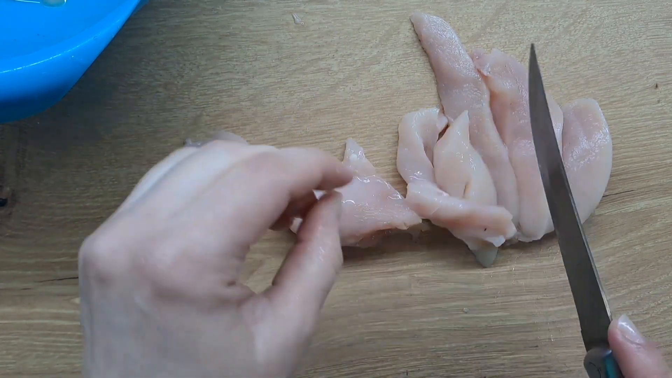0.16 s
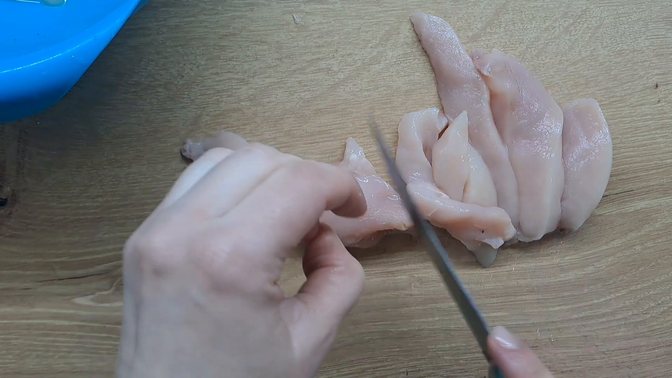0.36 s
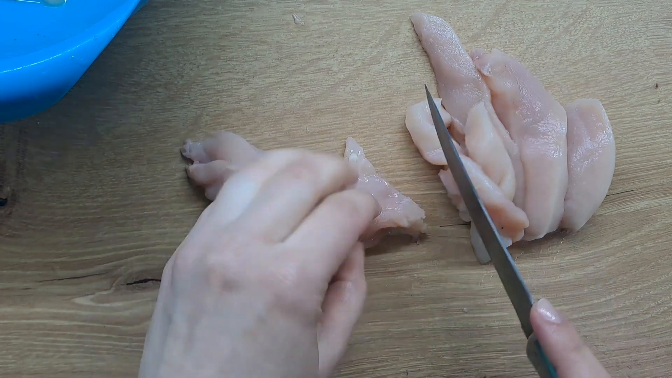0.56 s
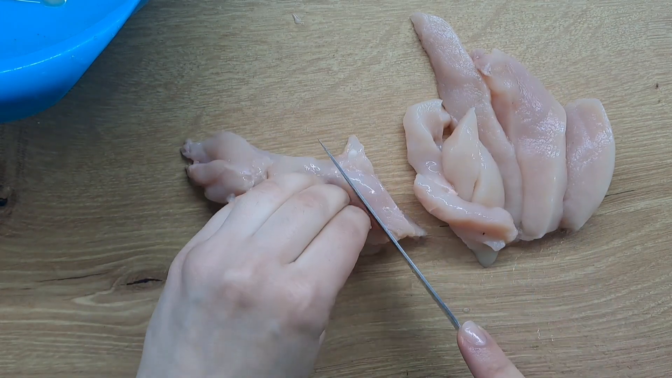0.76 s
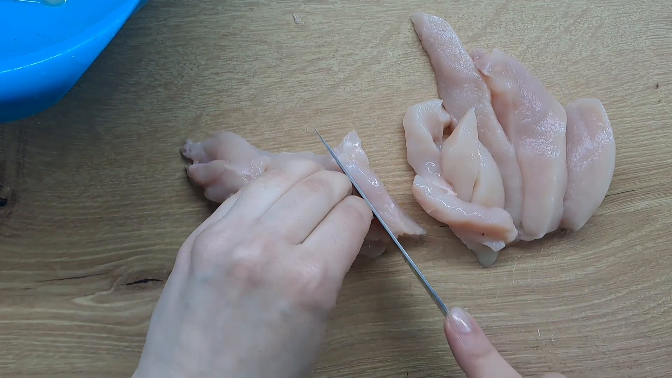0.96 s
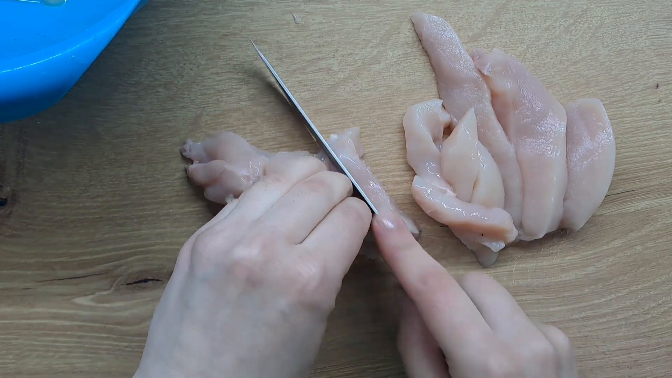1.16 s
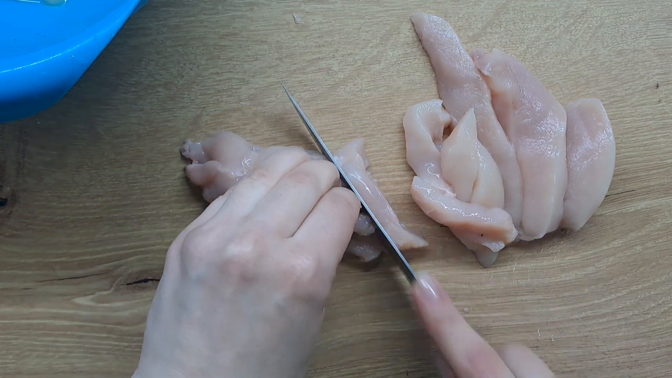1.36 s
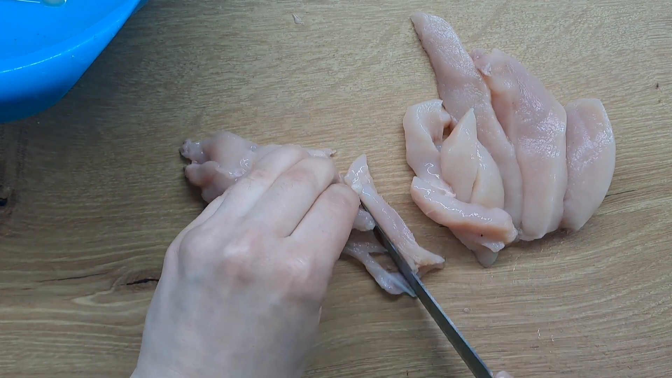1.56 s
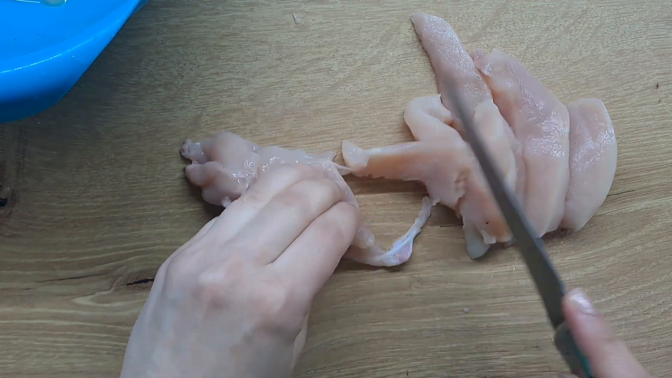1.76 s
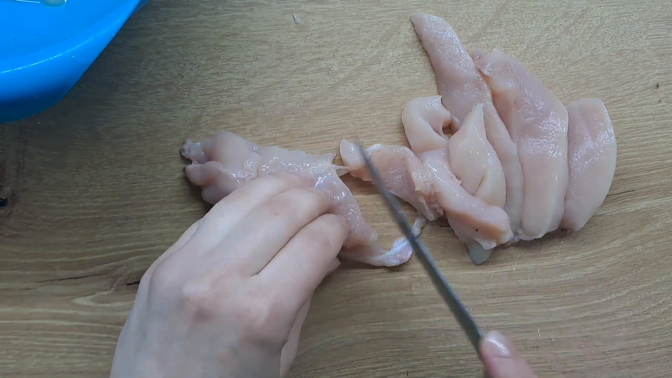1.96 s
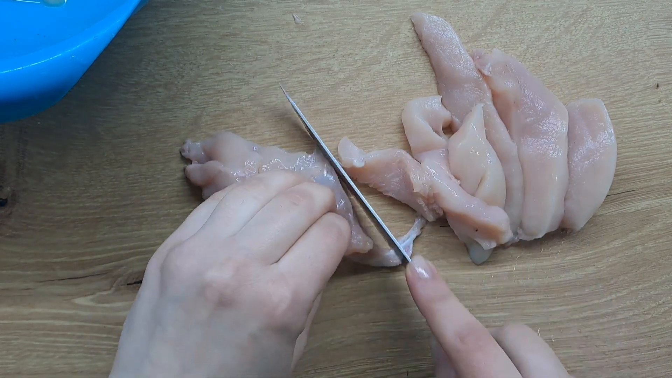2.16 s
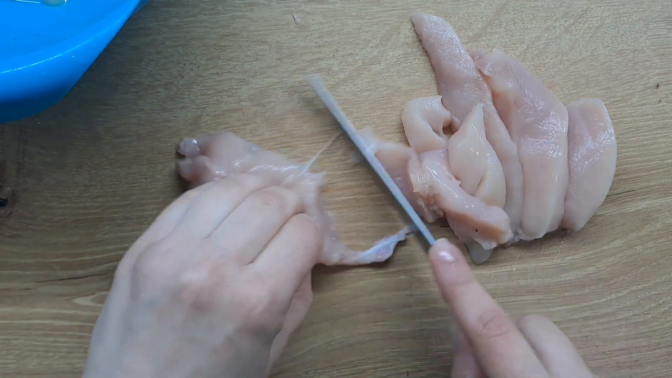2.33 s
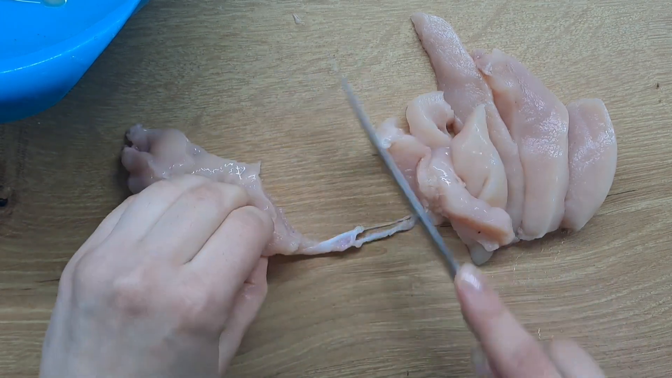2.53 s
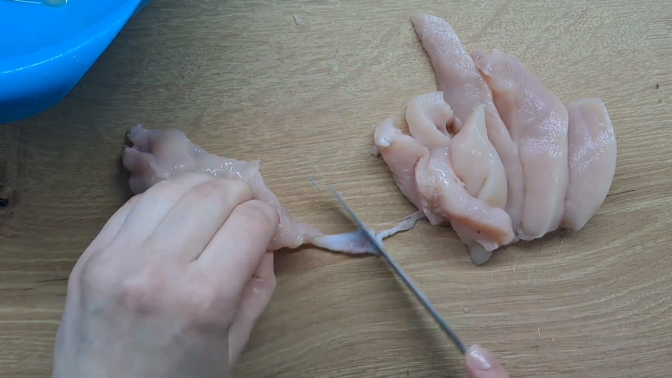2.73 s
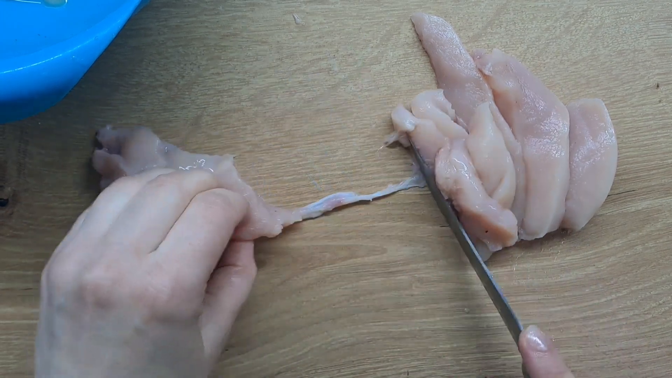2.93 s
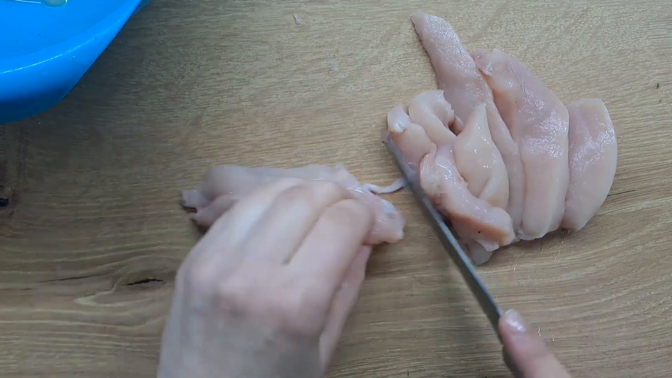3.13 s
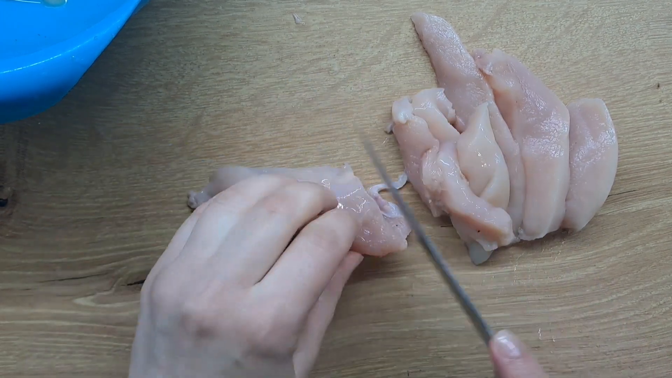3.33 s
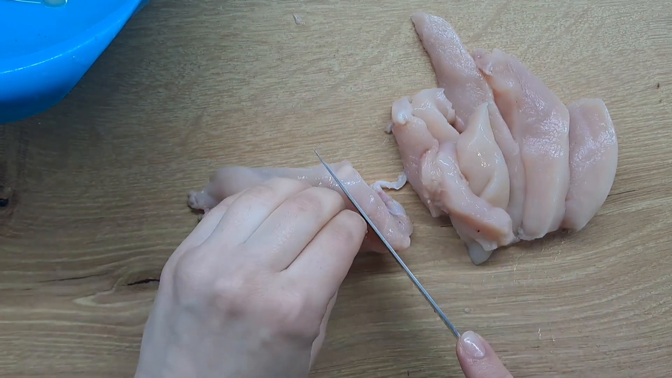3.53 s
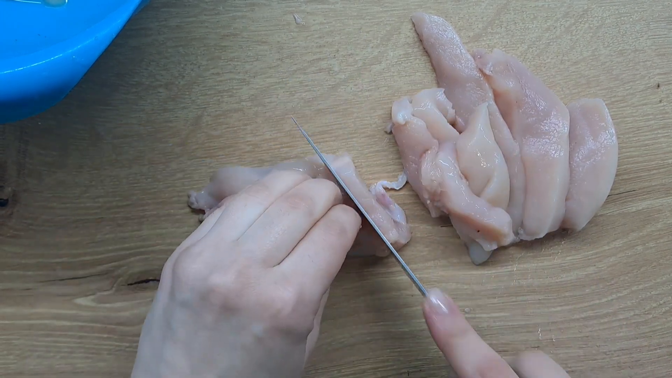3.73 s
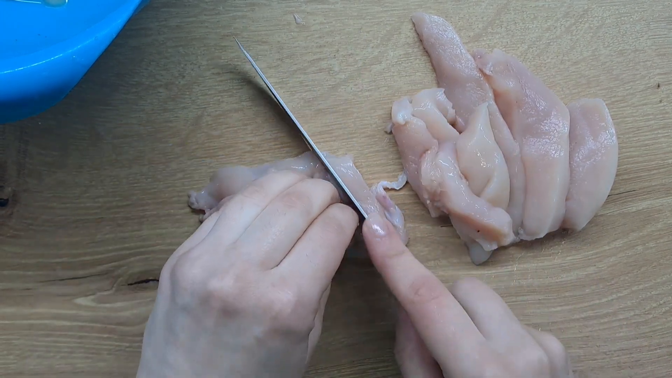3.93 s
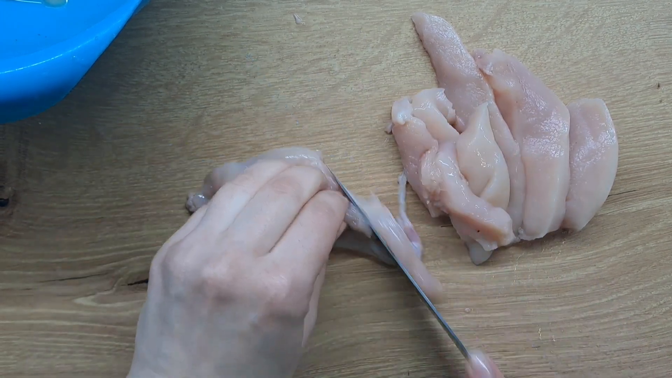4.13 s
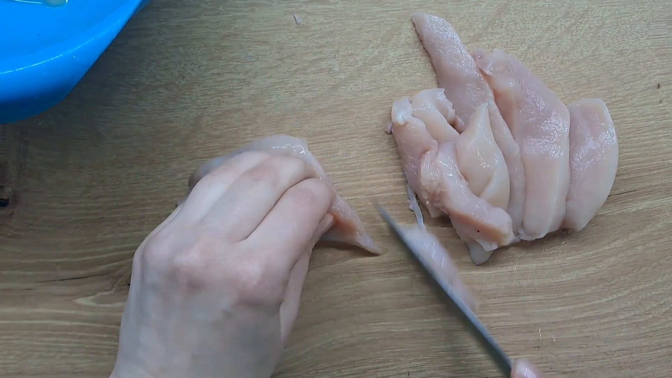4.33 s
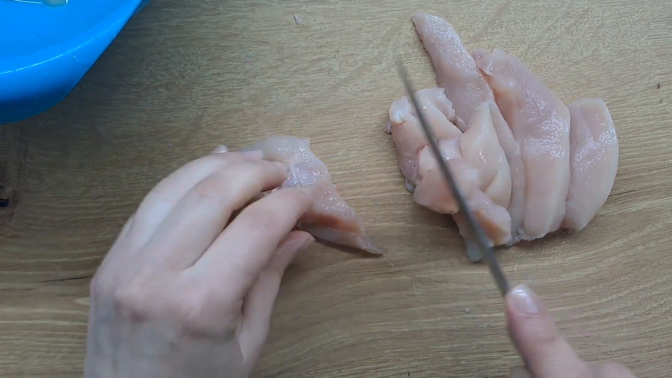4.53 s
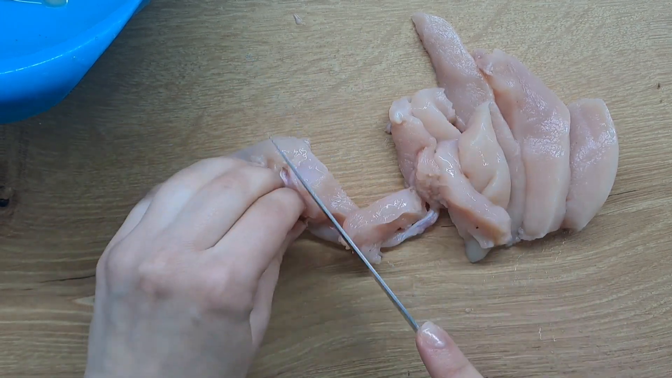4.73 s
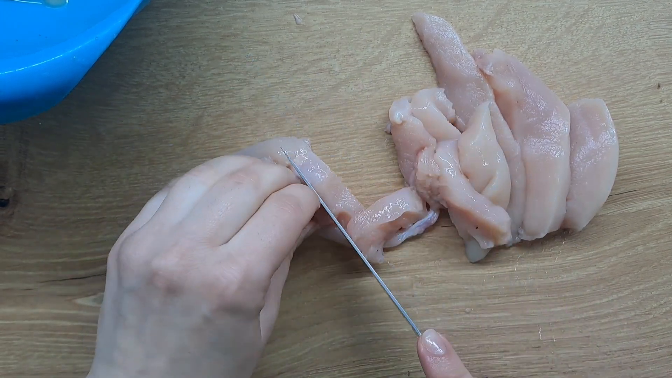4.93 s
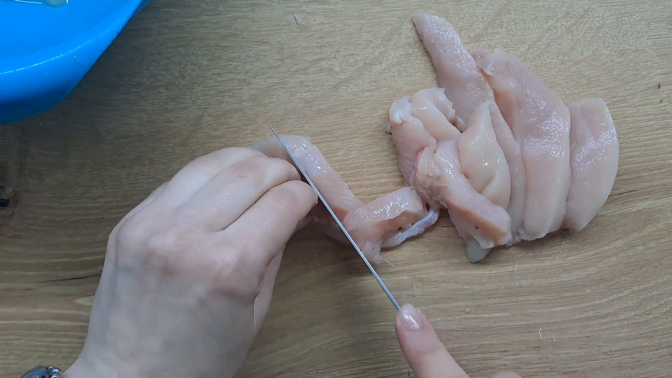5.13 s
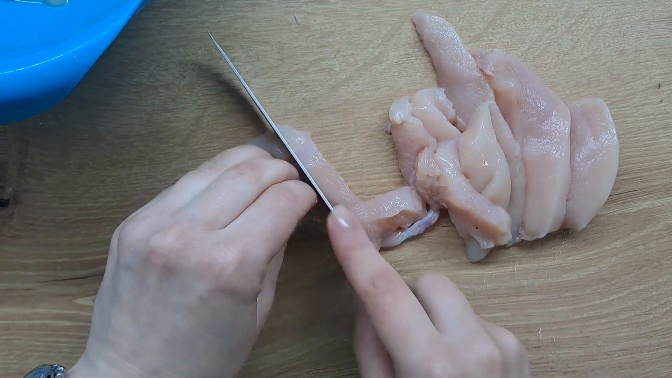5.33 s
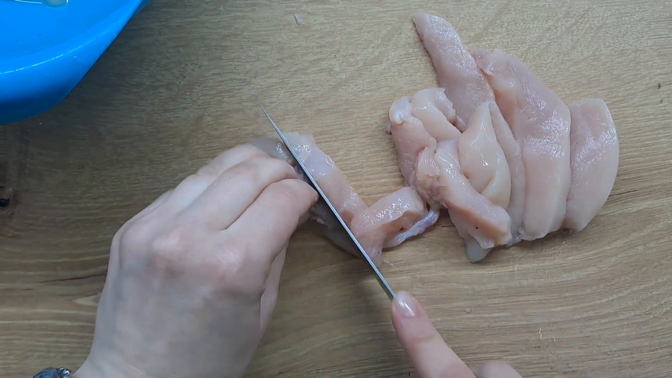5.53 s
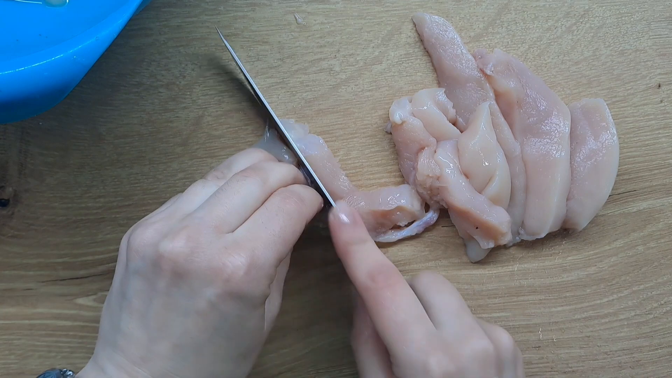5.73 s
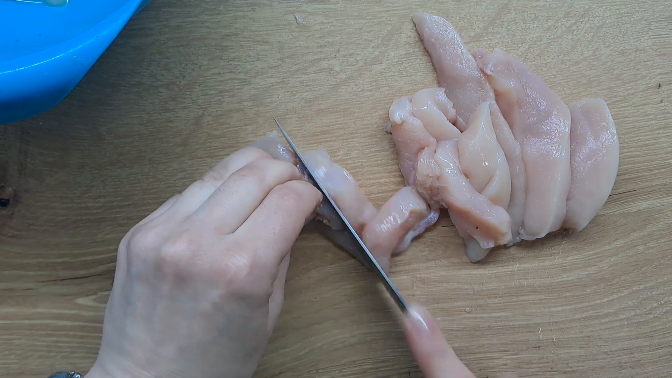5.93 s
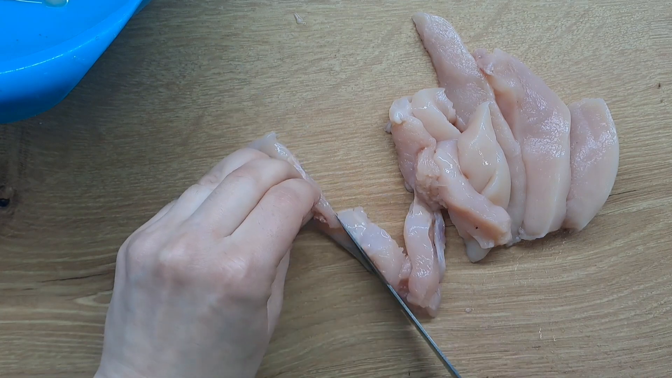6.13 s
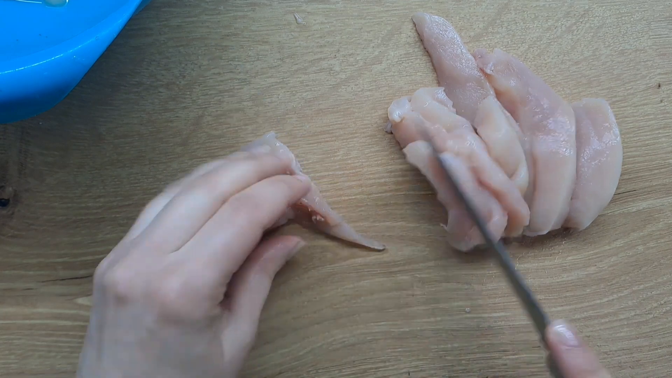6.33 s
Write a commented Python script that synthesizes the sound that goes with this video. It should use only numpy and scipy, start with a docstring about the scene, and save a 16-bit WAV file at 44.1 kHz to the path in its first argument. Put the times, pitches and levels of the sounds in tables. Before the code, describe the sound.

Close stereo pickup of raw meat being cut on a wooden board. Quick dry sawing strokes come in three groups, the first two opened by woody knocks. Short stick-slip scrapes of the edge follow each, ringing wood and a little steel. Soft meat flops, moist crackles and tiny high snaps fill the gaps, with low table booms under the hands and a steady faint room hum.

```python
"""A low room hum and a soft table boom are heard first; then raw meat is sliced on a wooden board.
The edge knocks to excite the board's modes, then rasps along the wood as filtered random fractures.
Pushed sideways, the blade judders by stick and slip, and its grit rings board and steel.
Meat squelches as crackling noise and flops as damped noise bursts; fine snaps tick on top."""
import sys
import numpy as np
from scipy import signal
from scipy.fft import rfft, irfft, next_fast_len
from scipy.io import wavfile

SR = 44100
rng = np.random.default_rng(int(sys.argv[2]) if len(sys.argv) > 2 else 0)


def pcm_store(signal):
    """Save signal as 16-bit PCM."""
    levels = np.round(np.clip(np.atleast_2d(signal), -1, 1) * 32767)
    wavfile.write(sys.argv[1], SR, levels.astype(np.int16).T)


N = 281799
TIME = np.arange(N) / SR   # seconds

# Sideways pushes of the blade. Each row: start, attack, time from start to judder release and length,
# all in seconds, relative levels of judder, grit and thrum in dB, judder frequency at start and end in Hz,
# relative levels of free steel, upper board modes and treble in dB.
PUSHES = [(1.625, .016, 0.014, 0.026, -34, -39, -38, 720, 401, -13.5, -2.5, -2),
          (2.168, .01, 0.094, .082, -49, -53.5, -52, 738.5, 659, -3.5, 1.5, 5),
          (2.277, 0.011, .018, 0.036, -50.5, -61, -55.5, 620, 560, -3, 2, -2),
          (2.339, 0.016, 0.089, 0.0951, -28.5, -30.5, -42.5, 650, 510.2, 1.5, -3.5, -1.5),
          (2.827, 0.0083, 0.015, 0.0573, -31, -37, -34, 641.7, 327, -8, 3.5, 1.5),
          (4.33, 0.037, 0.024, .042, -30.5, -35, -37, 690, 523.5, -13, -2.5, -4),
          (6.215, 0.03, 0.023, 0.043, -30, -34, -37, 680, 471.5, -19, 0, -6)]


def from_db(db):
    """Level in decibels to amplitude gain, by the logarithmic law."""
    return 10 ** (np.asarray(db) / 20)


def rms_one(x):
    """Normalise the effective (root-mean-square) amplitude to 1."""
    return x / np.sqrt(np.mean(x ** 2) + 1e-20)


def at_hz(points, hz):
    """Interpolate a spectrum linearly over log frequency."""
    f, value = np.transpose(points)
    return np.interp(np.log(np.maximum(hz, 1)), np.log(f), value)


def drift(rate):
    """Random modulation of rms 1: random values, rate of them per second, joined by straight lines."""
    knots = rng.standard_normal(N // 20)
    return rms_one(np.interp(TIME * rate, np.arange(len(knots)), knots))


def swell(s, attack, hold, t60):
    """Envelope of one gesture: a straight rise, a hold, an exponential release."""
    rise = np.clip((TIME - s) / attack, 0, 1)
    return rise * dying(np.maximum(TIME - s - attack - hold, 0), t60)


def bump(s, deviation):
    """Gaussian envelope around a moment; the standard deviation is in seconds."""
    return np.exp(-.5 * ((TIME - s) / deviation) ** 2)


def dying(t, t60):
    """Exponential decay by 60 dB in t60 seconds, levelling out at -180 dB."""
    return from_db(-60 * np.minimum(t / t60, 3))


def add(out, s, sound):
    """Superpose a sound from s seconds on."""
    start = round(s * SR)
    out[..., start:start + sound.shape[-1]] += sound[..., :N - start]


def colour(x, spectrum):
    """Minimum-phase filtering: folding the cepstrum makes a given spectrum causal; rms 1."""
    size = 2 * next_fast_len(N // 2 + 4096)
    hz = np.arange(size // 2 + 1) * SR / size
    cepstrum = irfft(np.log(from_db(at_hz(spectrum, hz))))
    cepstrum[1:size // 2] *= 2
    cepstrum[size // 2 + 1:] = 0
    response = np.exp(rfft(cepstrum))
    return rms_one(irfft(rfft(x, size) * response)[..., :N])


def resonate(x, hz, width):
    """Two-pole resonance: damping sets its width, and the gain at its peak is near 1."""
    r = np.exp(-np.pi * width / SR)
    zeros = np.array([1, 0, -1]) * (1 - r * r) / 2
    poles = [1, -2 * r * np.cos(2 * np.pi * hz / SR), r * r]
    return signal.lfilter(zeros, poles, x + 1e-18)


def gliding(x, hz, width):
    """A resonance of moving centre, held constant over blocks of 128 samples; rms 1."""
    out, state, r = np.zeros(len(x)), np.zeros(2), np.exp(-np.pi * width / SR)
    for i in range(0, len(x), 128):
        poles = [1, -2 * r * np.cos(2 * np.pi * hz[i] / SR), r * r]
        out[i:i + 128], state = signal.lfilter([1, 0, -1], poles, x[i:i + 128], zi=state)
    return rms_one(out)


def body(x, modes):
    """Modal superposition: parallel resonances of alternating sign; rms 1."""
    rung = 0
    for k, (hz, width, db) in enumerate(modes):
        rung = rung + from_db(db) * (-1) ** k * resonate(x, hz, width)
    return rms_one(rung)


def grains(per_s, spread_db):
    """Random tiny fractures as a Poisson-like train; each drives two paths with unrelated strengths."""
    born = rng.random(N) < per_s / SR
    sizes = from_db(spread_db * np.minimum(rng.exponential(1, N), 4))
    return rms_one(born * sizes * rng.standard_normal((2, N)))


def spread(pair):
    """Interaural coherence: two unrelated paths mix as mid and side, by a likeness set per frequency."""
    # Left-right likeness. Each row: frequency in Hz, likeness from 0 to 1.
    likeness = [(30, 0.04), (100, 1), (600, 0.64), (1400, 0), (2400, 0), (4000, 0.65), (9000, 0)]
    length = pair.shape[1]
    size = next_fast_len(length, True)
    alike = np.clip(at_hz(likeness, np.arange(size // 2 + 1) * SR / size), 0, 1)
    mid, side = rfft(pair, size)
    common = np.sqrt((1 + alike) / 2) * mid
    opposed = np.sqrt((1 - alike) / 2) * side * [[1], [-1]]
    return irfft(common + opposed, size)[:, :length]


def background():
    """Stationary noise shaped by spectrum: a low room hum and the microphone's faint hiss."""
    # Hum spectrum. Each row: frequency in Hz, relative spectral level in dB.
    hum_spectrum = [(13, -55), (22, -22.5), (43, -6), (64, -20), (99, -7.5), (150, -8.5), (169, -16.5),
                    (206, -10.5), (300, -12.5), (338, -11.5), (412, -18.5), (474, -17.5), (523, -19.5),
                    (1330, -32), (2500, -44), (3250, -70), (5500, -120)]
    # Hiss spectrum. Each row: frequency in Hz, relative spectral level in dB.
    hiss_spectrum = [(2000, -17), (3200, -8.5), (5300, -12), (6200, -1.5), (6900, -0.5), (7300, -0.5),
                     (7900, 3), (8800, -8), (9900, -3.5), (10800, 1.5), (12000, -6), (14200, -11),
                     (15700, -5)]
    hum = spread(colour(rng.standard_normal((2, N)), hum_spectrum))
    hiss = colour(rng.standard_normal((2, N)), hiss_spectrum)
    return from_db(-55) * hum + from_db(-69.5) * hiss


def kitchen(x):
    """Diffuse reverberation: decaying noise in bands, each with its own t60, shortest in the top treble."""
    # Room decay. Each row: frequency in Hz, t60 in seconds.
    decay_times = [(100, 0.29), (500, 0.49), (1400, 0.33), (4000, 0.3), (12000, 0.25)]
    t, response = TIME[:SR // 2], 0
    edges = np.geomspace(60, 17000, 9)
    for low, high in zip(edges, edges[1:]):
        band_filter = signal.butter(2, [low, high], "band", fs=SR, output="sos")
        band = signal.sosfilt(band_filter, rng.standard_normal((2, len(t))))
        response = response + band * dying(t, at_hz(decay_times, np.sqrt(low * high)))
    # the reflections build up over a few milliseconds
    response = rms_one(response * (1 - dying(t, 0.0044))) / np.sqrt(len(t))
    return signal.fftconvolve(x, response, axes=1)[:, :N]


def table():
    """Forced low resonance: the table booms under the working hands, more when they press or push."""
    # Hands pressing. Each row: middle and standard deviation in seconds, relative boom level in dB.
    presses = [(.08, .1, -52.5), (1.2, 0.096, -41), (3.17, 0.026, -38.5), (3.977, 0.092, -42.5),
               (5.381, 0.038, -41.5), (6.003, 0.26, -42.5)]
    push_boom_db = -15.5   # each push nudges the table, relative to its judder setting
    boom = rms_one(resonate(resonate(rng.standard_normal(N), 87.0, 36), 87.0, 36))
    weight = from_db(-53)   # hands merely resting and shifting, on the same relative scale
    for s, deviation, db in presses:
        weight = weight + from_db(db) * bump(s, deviation)
    for s, attack, juddering, _, judder_db, *_ in PUSHES:
        weight = weight + from_db(judder_db + push_boom_db) * swell(s, attack, juddering, t60=0.41)
    return from_db(-7.0) * weight * boom


def ticks():
    """Impulsive release excites broad resonances: clear snaps, and faint ones scattered at random."""
    # Sticky films snap or the edge catches. Each row: start in seconds, relative peak in dB, pitch in Hz.
    clear = [(.9532, -50, 7650), (1.0261, -49, 9900), (1.272, -40, 11700), (1.6674, -48, 10500),
             (2.003, -50.5, 1260), (2.0223, -50.5, 7200), (2.1765, -43, 10700), (2.3595, -24.5, 9800),
             (3.2056, -44, 9800), (3.8387, -49.5, 11300), (5.1696, -51.5, 7800), (5.2264, -36, 8000),
             (5.3617, -50, 4620), (6.1, -39, 8300), (6.1539, -45.5, 12400), (6.3094, -47, 2610)]
    faint_per_s, faint_db, faint_hz = 3.5, -60, 8440   # smaller films; same relative level scale
    out, t = np.zeros((2, N)), TIME[:SR // 20]
    burst = dying(t, .006) + .45 * dying(t, .04)
    chance = rng.uniform(-1, 1, size=(40, 3))
    faint = []
    for k, (when, strength, pitch) in enumerate(chance):
        s = (k + .5 + when / 2) / faint_per_s   # one at random within each equal slot
        faint.append((s, faint_db + 4 * strength, faint_hz * 1.35 ** pitch))
    for s, db, hz in list(clear) + faint:
        width = 0.47 * hz
        noise = rng.standard_normal((2, len(t))) * burst
        snap = resonate(resonate(noise, hz, width), hz, width)
        if s < TIME[-1]:
            add(out, s, from_db(db + 8.5) * snap / np.abs(snap).max())
    return out


def wet_meat():
    """Crackling noise: moist fibres part in many small random fractures as the meat parts and slides."""
    # Each row: start, attack, hold and release t60 in seconds, relative level in dB.
    squelches = [(1.02, .01, .13, .1, -60), (1.698, 0.047, .005, 0.1, -52), (3.695, 0.11, 0.074, .1, -58),
                 (5.204, 0.0074, 0.017, 0.15, -40.5), (5.242, 0.043, 0.098, 0.43, -50),
                 (5.458, .05, .01, 0.34, -53.5), (5.625, 0.058, .01, .1, -52),
                 (6.29, 0.032, 0.0062, 0.14, -45.5)]
    # Crackle spectrum. Each row: frequency in Hz, relative spectral level in dB.
    wet_spectrum = [(800, 3.5), (2300, 1), (3300, 0), (4500, 3.5), (5600, 0), (8000, 4.5), (11000, 2),
                    (16000, 1.5)]
    crackle = colour(grains(per_s=6000, spread_db=0), wet_spectrum) * from_db(2.0 * drift(60))
    parting = 0
    for s, attack, hold, t60, db in squelches:
        parting = parting + from_db(db) * swell(s, attack, hold, t60)
    return from_db(-4.5) * crackle * parting


def flops():
    """Heavily damped impact: meat flops and finger pats are short bursts of narrow-band noise."""
    # Each row: start in seconds, relative level in dB, pitch in Hz.
    pats = [(0.795, -48, 290), (2.7, -37, 280), (3.168, -49.5, 280), (3.381, -52.5, 423), (3.68, -50, 267),
            (5.014, -42, 407), (5.045, -48, 237), (5.312, -46, 220), (5.358, -48, 314)]
    out, t = np.zeros(N), TIME[:SR // 4]
    for s, db, hz in pats:
        pat = rms_one(resonate(resonate(rng.standard_normal(len(t)), hz, 180), hz, 180))
        add(out, s, from_db(db - 0.5) * pat * (dying(t, 0.21) - dying(t, 0.0061)))
    return out


def knocks():
    """Impact excitation: a contact pulse drives the board's modes; a crack and a table boom join it."""
    # The edge meets the wood, cushioned by meat. Each row: start and contact time in seconds,
    # relative levels of wood, bright crack and table boom in dB.
    landings = [(1.166, 0.00052, -26, -29, -29), (2.112, 0.00026, -44, -49, -39.5),
                (2.699, 0.0023, -39.5, -63, -27.5), (3.149, 0.0014, -55.5, -76, -39),
                (3.866, 0.00063, -31, -53, -34)]
    # Struck board. Each row: frequency in Hz, relative level in dB, t60 in seconds.
    board_modes = [(316, -16.5, 0.11), (424, -7.5, 0.049), (560, 3, 0.016), (744, -0.5, 0.033),
                   (1115, -7.5, 0.024), (1337, -8.5, 0.06)]
    # The table's lowest mode: frequency in Hz, t60 and swell t60 in seconds, relative level in dB.
    table_mode = (90, 0.2, 0.093, 6.7)
    out, t = np.zeros((2, N)), TIME[:SR // 2]
    table_hz, table_t60, build_up, table_db = table_mode
    boom_envelope = dying(t, table_t60) - dying(t, build_up)
    boom = from_db(table_db) * np.sin(2 * np.pi * table_hz * t) * boom_envelope
    modes = 0
    for k, (hz, db, t60) in enumerate(board_modes):
        modes = modes + from_db(db) * (-1) ** k * np.sin(2 * np.pi * hz * t) * dying(t, t60)
    for s, contact, wood_db, crack_db, boom_db in landings:
        # a longer contact leaves the high modes still
        push = np.sin(np.pi * np.minimum(t / contact, 1)) ** 2
        board = signal.fftconvolve(push, modes)[:len(t)]
        crack = resonate(rng.standard_normal((2, len(t))), 1980, 1200)
        crack = crack * dying(t, 0.078) * (1 - dying(t, 0.0065))
        wood = from_db(wood_db + 7.0) * board / np.abs(board).max()
        add(out, s + .0015, wood + from_db(crack_db + 7.5) * crack + from_db(boom_db) * boom)
    return out


def scrapes():
    """Stick-slip friction: a sinking judder, grit that rings board and steel, and a building low thrum."""
    # Grit spectrum. Each row: frequency in Hz, relative spectral level in dB.
    grit_spectrum = [(600, -8), (1020, -17), (1350, 4), (1800, -2), (2250, 4.5), (3000, -0.5), (3900, -6),
                     (5200, -7.5), (6700, -12), (7800, -5), (9500, -11.5), (12200, -3), (13800, -9),
                     (16000, -14)]
    # Upper board modes. Each row: frequency in Hz, width in Hz, relative level in dB.
    upper_modes = [(833, 190, 2.5), (1265, 245, 7.5), (1714, 35, 1.5), (2096, 103, 4.5), (2720, 140, -32),
                   (3990, 150, 0)]
    # Steel blade modes. Each row: frequency in Hz, width in Hz, relative level in dB.
    blade_modes = [(1580, 510, -5), (2014, 85, 5.5), (3780, 470, -5.5), (4690, 28, -13), (10750, 83, 3.5),
                   (13030, 110, -2.5)]
    judder_t60, grit_t60, thrum_t60 = 0.077, 0.11, 0.093   # seconds, each part's release
    sag_db_per_s = 28   # a push eases off as the strip starts to slide
    bite_db, bite_t60 = 5, 0.19   # extra treble while the edge first bites, dying in seconds
    pan_db = 0.2   # judder and thrum, left over right
    grit = grains(per_s=5000, spread_db=0.5)
    plain = colour(grit, grit_spectrum)
    wood, steel = body(grit, upper_modes), body(grit, blade_modes)
    treble = signal.sosfilt(signal.butter(1, 5000, "high", fs=SR, output="sos"), plain)
    bite_filter = signal.butter(1, 8900, "high", fs=SR, output="sos")
    thrum = rms_one(resonate(resonate(grit[0], 349, 100), 349, 100))
    unevenness, surge = drift(600), from_db(2.33 * drift(130))
    out, low = 0, 0
    for (s, attack, juddering, length, judder_db, grit_db, thrum_db,
         start_hz, end_hz, steel_db, wood_db, treble_db) in PUSHES:
        hz = np.interp(TIME, [s, s + length], [start_hz, end_hz])
        phase = 2 * np.pi * np.cumsum(hz * np.exp(.15 * unevenness)) / SR
        slipping = 1 + 0.41 * np.cos(phase)   # grit comes in bursts, one for each slip
        sliding_s = np.clip(TIME - s - attack, 0, length)
        ringing = from_db(wood_db) * wood + from_db(steel_db) * steel
        rasp = rms_one(plain + (from_db(treble_db) - 1) * treble + ringing)
        bite = from_db(bite_db * dying(sliding_s, bite_t60)) - 1
        rasp = rasp + bite * signal.sosfilt(bite_filter, rasp)
        force = from_db(-sag_db_per_s * sliding_s) * swell(s, attack, length - attack, grit_t60)
        out = out + from_db(grit_db + 2.5) * force * slipping * rasp
        judder = swell(s, attack, juddering - attack, judder_t60) * surge * np.sin(phase)
        low = low + from_db(judder_db + 3.5) * judder
        building = swell(s, 0.6 * length, 0.57 * length, thrum_t60)
        low = low + from_db(thrum_db - 4.0) * building * thrum
    low = signal.sosfilt(signal.butter(4, 880, fs=SR, output="sos"), low)
    return spread(out) + low * from_db(pan_db / 2 * np.array([[1], [-1]]))


def draws():
    """Fracture noise through moving resonances: wood fibres break and the ring shifts with the contact."""
    # Three strokes to a slice. Each row: start, attack, hold and release t60 in seconds,
    # relative levels of rasp and edge hiss in dB, board resonance in Hz.
    strokes = [(1.163, 0.0047, 0.037, 0.17, -41, -45.5, 790),
               (1.257, 0.1, 0.0039, 0.062, -38.5, -42.5, 750), (1.395, .018, 0.098, 0.25, -38, -43.5, 1140),
               (3.867, 0.0097, 0.02, 0.22, -42.5, -44.5, 840), (3.965, 0.062, .05, 0.21, -41.5, -44.5, 833),
               (4.074, 0.035, 0.086, 0.38, -38, -42.5, 1257), (5.691, 0.025, 0.028, 0.18, -40, -39.5, 1275),
               (5.813, .09, 0.041, 0.18, -38.5, -38.5, 1040), (5.928, 0.033, 0.09, .27, -37.5, -45.5, 1180)]
    # Edge squeaks. Each row: middle and standard deviation in seconds, frequency and width in Hz,
    # relative level in dB.
    squeaks = [(1.082, 0.039, 4700, 1300, -66), (2.229, 0.023, 3850, 328, -53),
               (5.48, 0.035, 4500, 900, -69), (5.95, 0.0057, 7870, 900, -31)]
    # Rasp spectrum. Each row: frequency in Hz, relative spectral level in dB.
    rasp_spectrum = [(250, -6), (520, -7), (760, -2.5), (1200, 1.5), (1400, 0.5), (1780, -21.5),
                     (2200, 1.5), (2700, -9), (3600, -14), (5600, -33), (9000, -34)]
    # Edge hiss spectrum. Each row: frequency in Hz, relative spectral level in dB.
    hiss_spectrum = [(2500, -50), (4500, 0), (6000, -1), (7700, 7), (9500, 2.5), (12200, 5.5),
                     (13500, -1.5), (16000, -3)]
    # Resonances that wander with the contact. Each row: mean frequency and width in Hz, relative level in dB.
    wandering = [(2163, 120, -12), (2800, 220, -8), (3320, 46, -11)]
    # the fibres give way in quick uneven succession
    fibres = grains(per_s=9000, spread_db=1.9) * from_db(1.16 * drift(140) + 1.0 * drift(35))
    rasp_gain, hiss_gain, path = 0, 0, []
    for s, attack, hold, t60, rasp_db, hiss_db, hz in strokes:
        pressure = swell(s, attack, hold, t60)
        rasp_gain = rasp_gain + from_db(rasp_db) * pressure
        hiss_gain = hiss_gain + from_db(hiss_db) * pressure
        path += [(s + attack, hz), (s + attack + hold, hz)]   # the ring glides from stroke to stroke
    wood = colour(fibres, rasp_spectrum)
    ring_hz = np.interp(TIME, *np.transpose(path)) * np.exp(0.062 * drift(25))
    wood[0] += from_db(-0.5) * gliding(fibres[0], ring_hz, width=154)
    for centre, width, db in wandering:
        level = from_db(db + 3.8 * drift(18))
        wood[0] += level * gliding(fibres[0], centre * np.exp(0.087 * drift(12)), width)
    squeak = 0
    for s, deviation, hz, width, db in squeaks:
        tone = rms_one(resonate(resonate(fibres, hz, width), hz, width))
        squeak = squeak + from_db(db) * bump(s, deviation) * tone
    hiss = from_db(-2.0) * hiss_gain * colour(fibres, hiss_spectrum)
    return spread(rasp_gain * rms_one(wood) + hiss + squeak)


def scene():
    """Superposition and sympathetic resonance: the work rings board and table, and the room reflects it."""
    # Board and table ringing along. Each row: frequency in Hz, width in Hz, relative level in dB.
    sympathy = [(303.5, 15.4, -1.5), (364.5, 11.4, 0), (545, 5.2, -3), (601.5, 16, 0), (663, 41, -4),
                (760, 58, 3), (936, 12, 0), (1150, 26, 0.5), (1606, 19, -8), (1686, 23, -6), (2021, 12, -7),
                (3666, 17, 3), (3760, 26, -21), (4680, 14, 3.5)]
    work = draws() + scrapes() + knocks() + flops() + wet_meat() + ticks()
    ringing = 0
    for hz, width, db in sympathy:
        ringing = ringing + from_db(db) * resonate(work, hz, width)
    work = work + ringing
    work[1] = np.interp(TIME - .00007, TIME, work[1])   # the cut lies nearer the left ear
    work = from_db(-2.5) * work + from_db(-10.0) * kitchen(work)
    treble = signal.sosfilt(signal.butter(1, 9000, "high", fs=SR, output="sos"), work)
    work = work + from_db(-9.5) * treble * [[-1], [1]]   # the treble leans right
    boom = table() * from_db(1.7 * np.array([[1], [-1]]))   # the boom leans left
    return work + boom + background()


def record(dry):
    """Band limiting: a high-pass thins the deepest bass and a steep low-pass cuts the top."""
    thinned = signal.sosfilt(signal.butter(3, 29, "high", fs=SR, output="sos"), dry)
    return signal.sosfilt(signal.ellip(12, .1, 80, 15950, fs=SR, output="sos"), thinned)


dry = scene()
out = record(dry)
pcm_store(out)
```